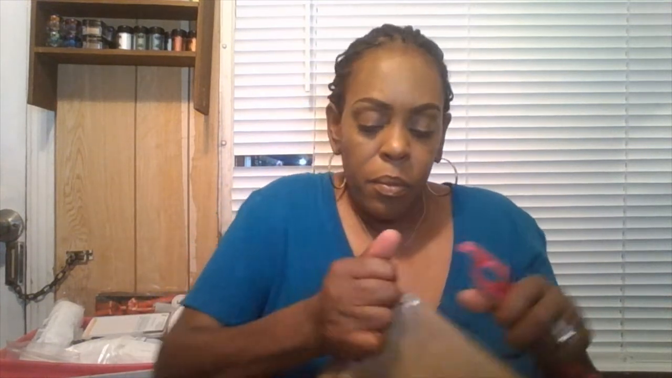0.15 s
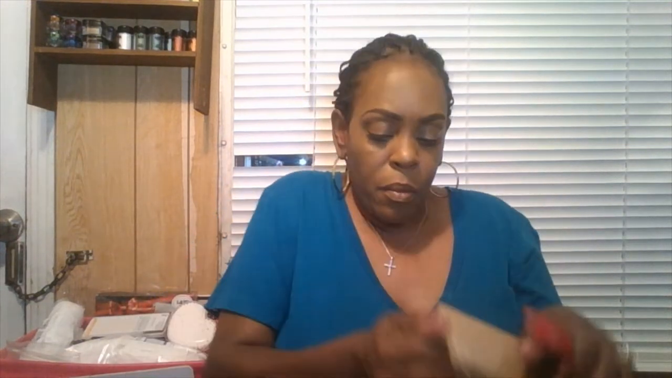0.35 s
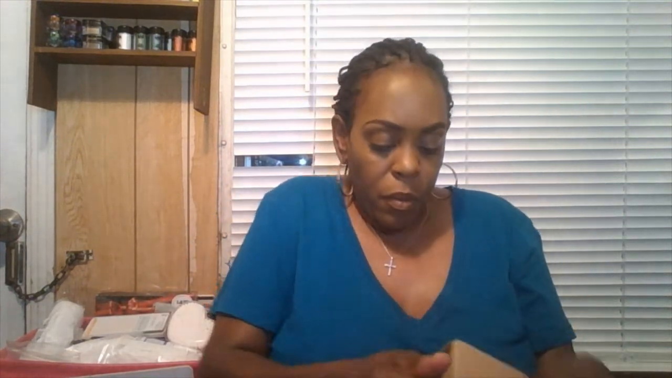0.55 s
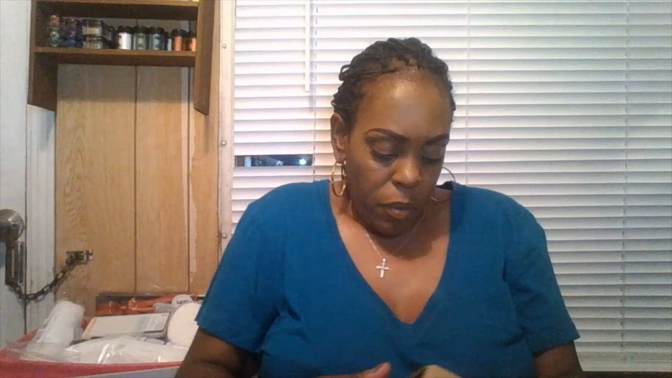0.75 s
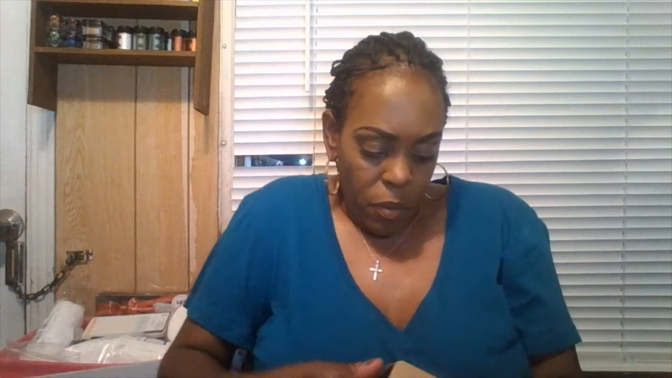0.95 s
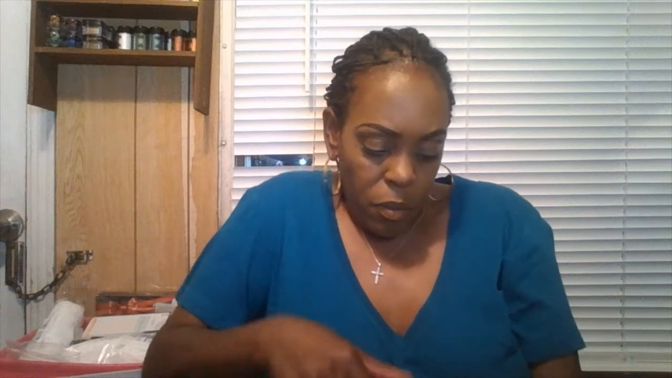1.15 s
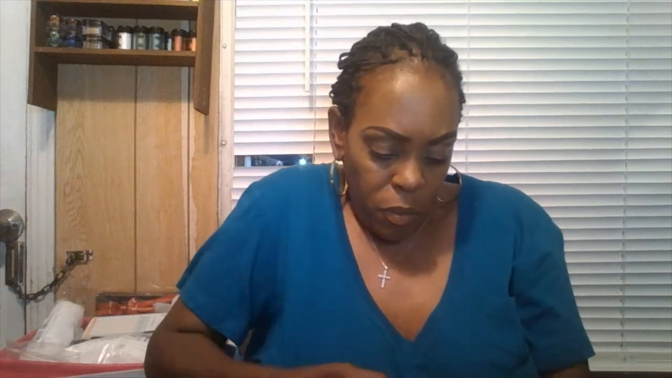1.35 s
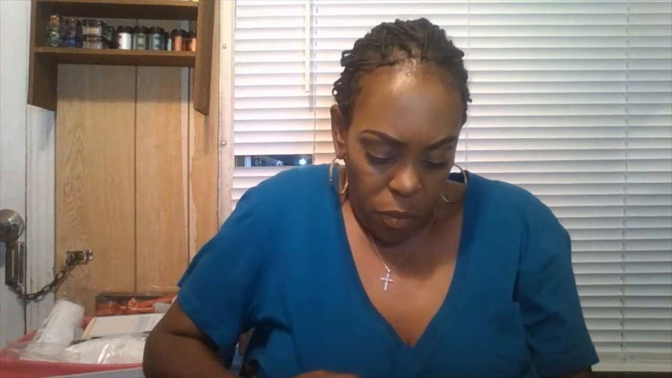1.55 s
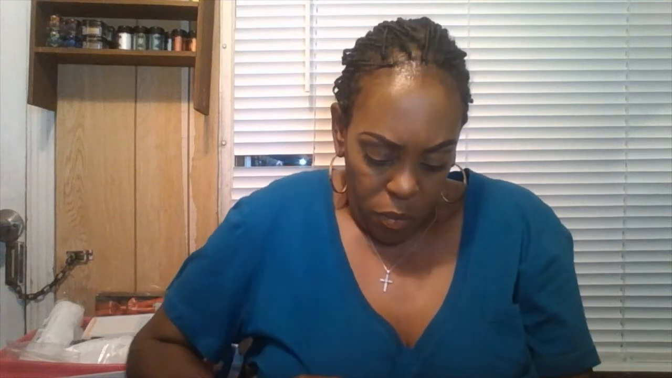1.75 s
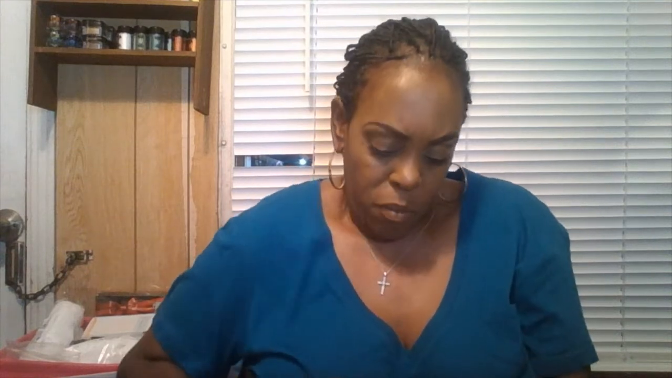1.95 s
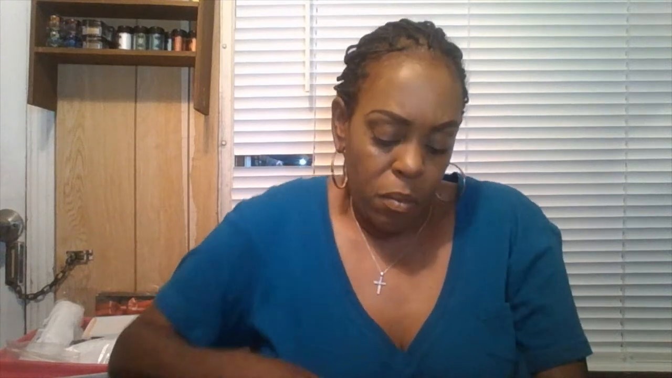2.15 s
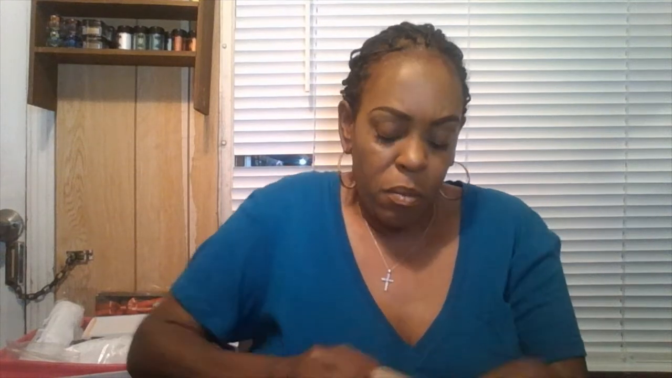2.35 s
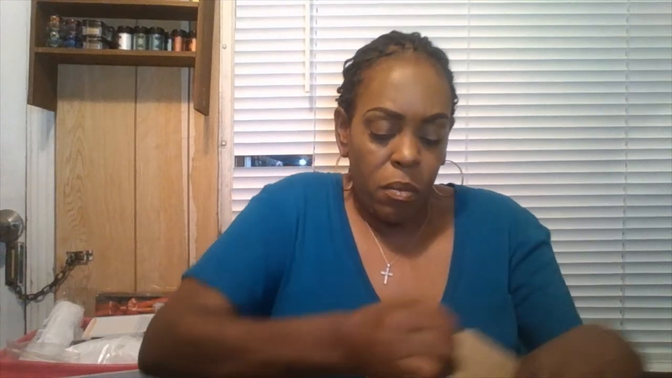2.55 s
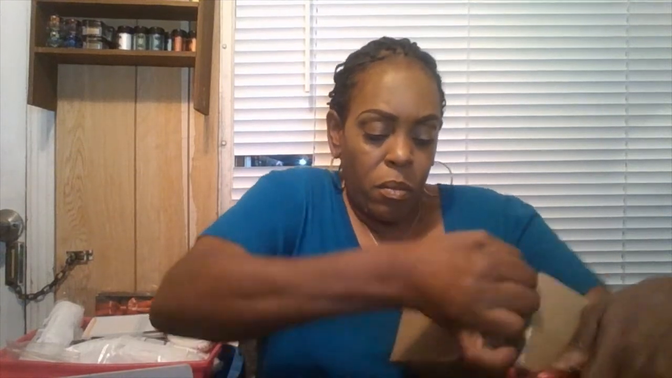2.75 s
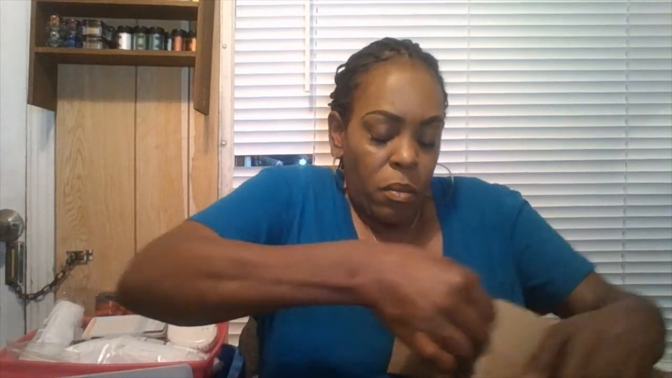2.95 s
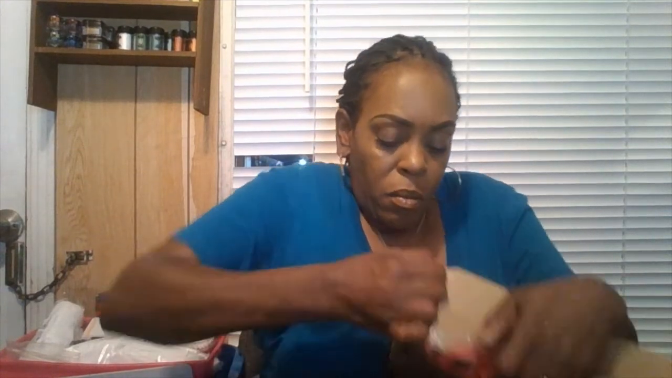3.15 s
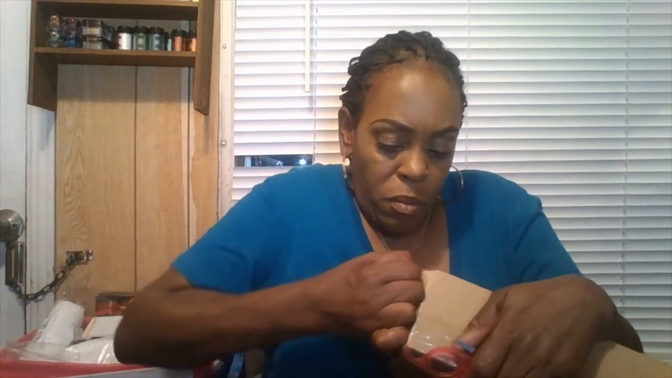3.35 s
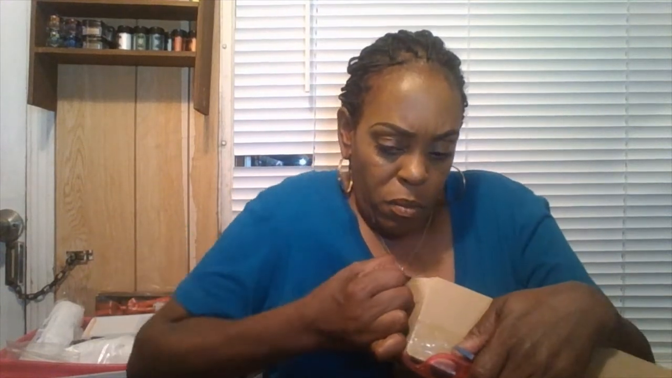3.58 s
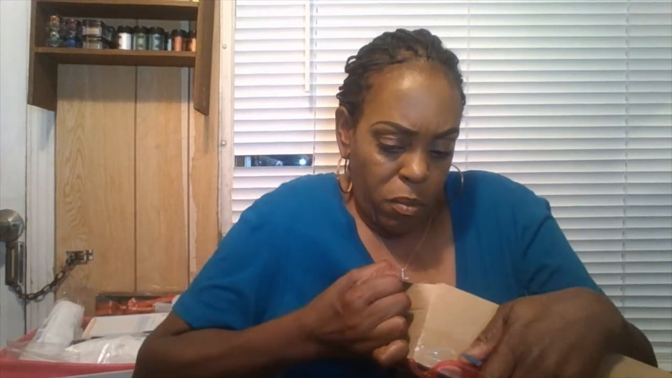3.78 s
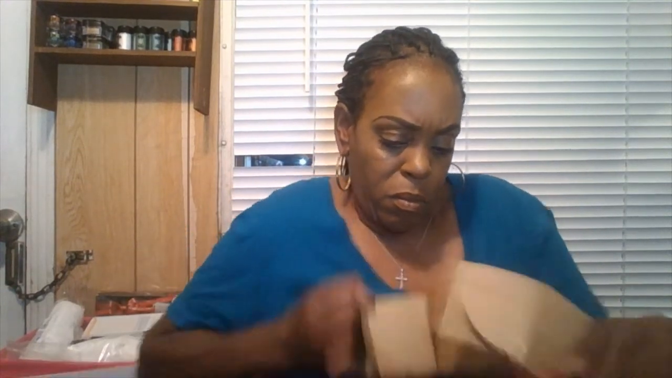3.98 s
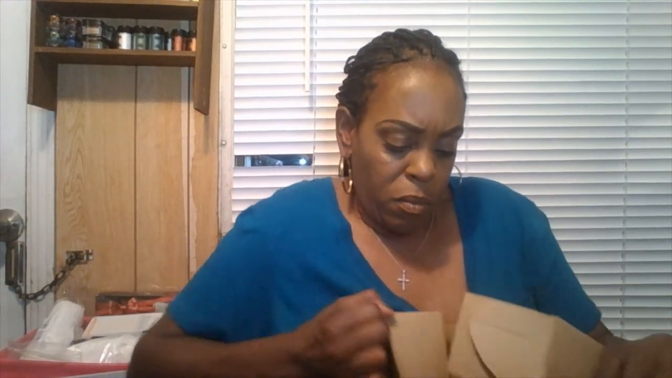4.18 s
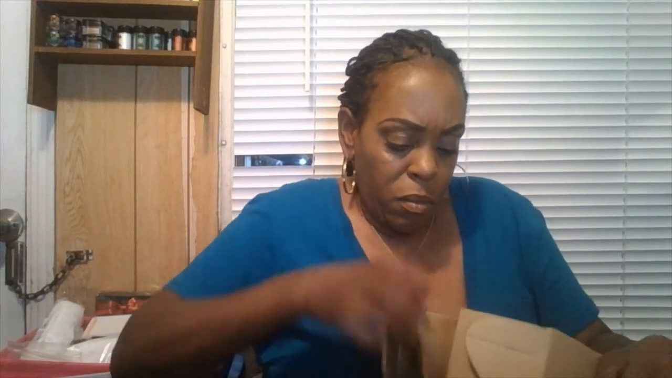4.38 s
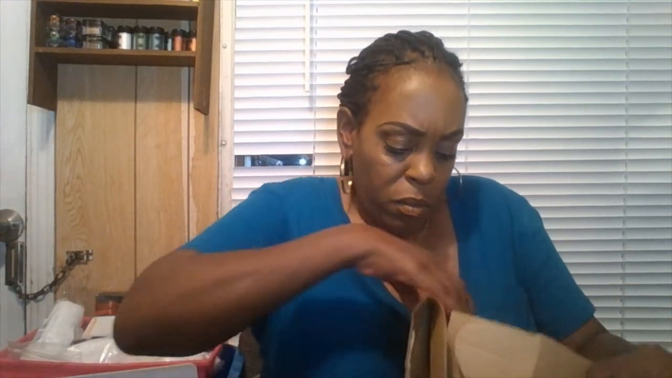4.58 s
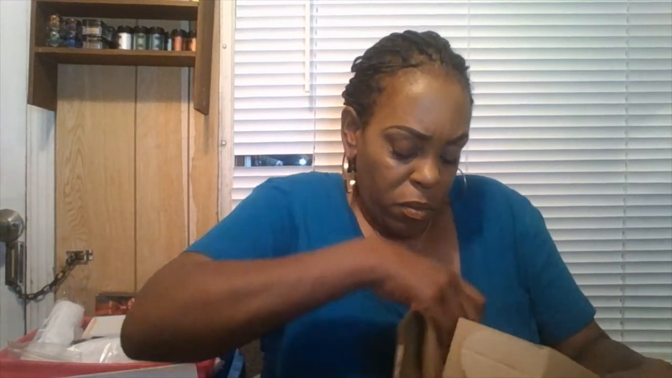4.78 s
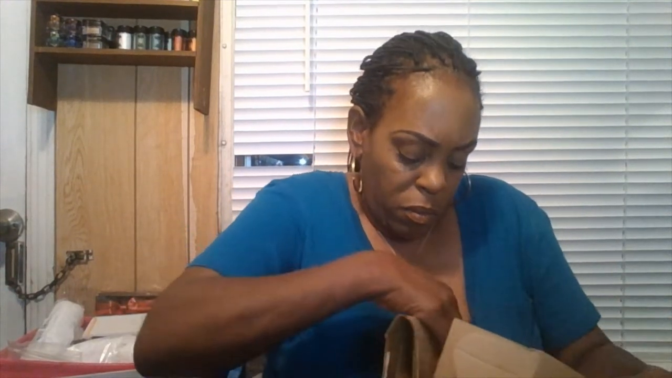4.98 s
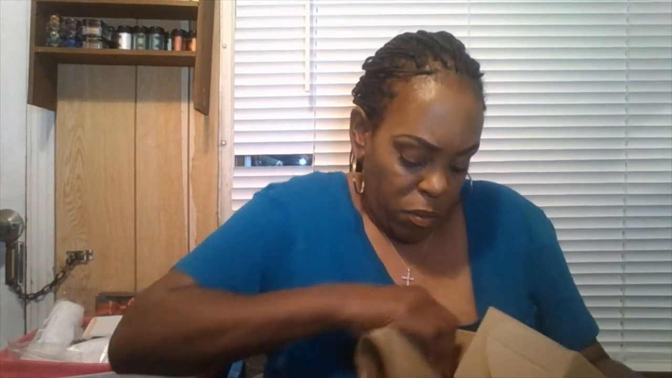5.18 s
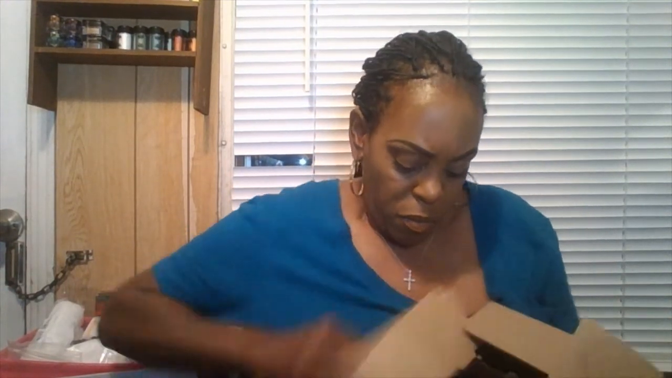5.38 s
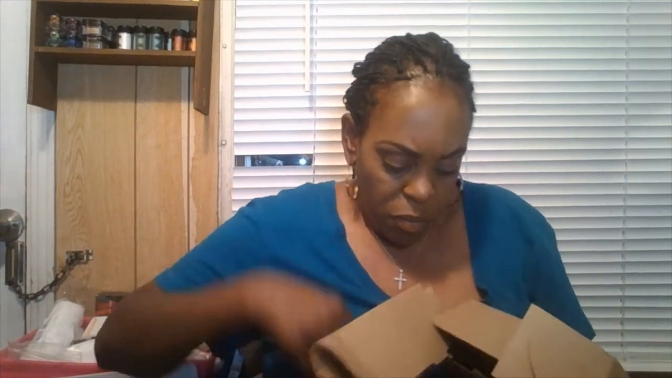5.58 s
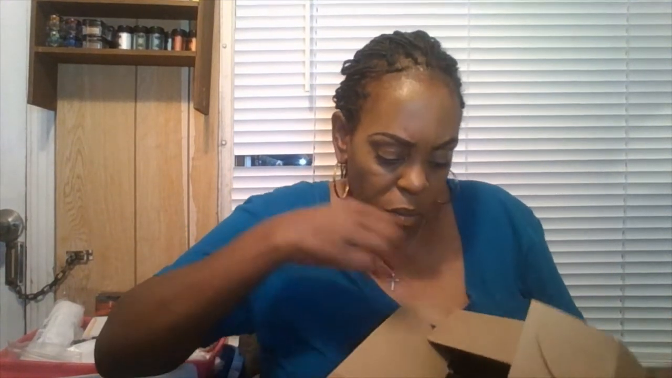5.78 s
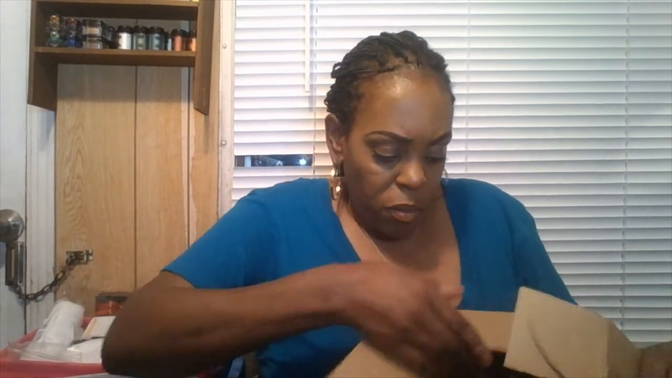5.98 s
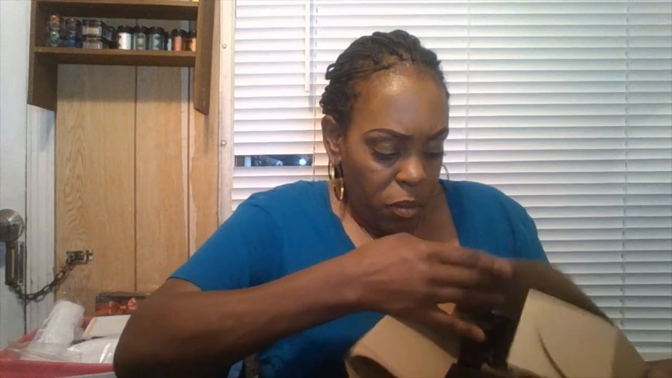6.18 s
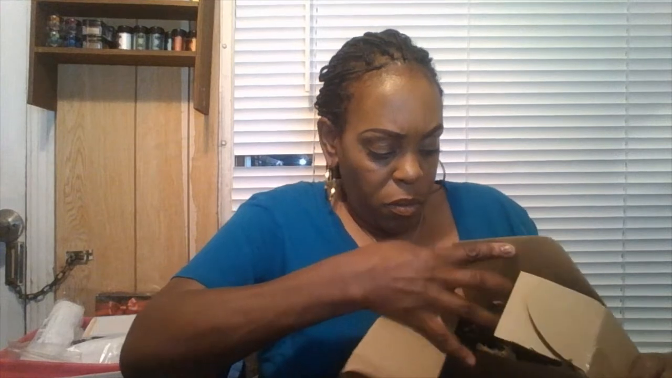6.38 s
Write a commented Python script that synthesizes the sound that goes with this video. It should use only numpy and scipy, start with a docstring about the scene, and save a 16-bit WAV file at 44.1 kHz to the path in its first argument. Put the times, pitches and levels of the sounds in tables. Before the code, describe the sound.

A small nearby microphone catches cardboard being pulled open indoors. Light fibrous rubbing and dull flap knocks lead to a series of dry ticks and more knocks. Tape suddenly tears with a burst of snaps; after gentle handling it rips again, louder and more abrupt, and settles into faint rustle. Room reflections are short, over steady low hum, hiss and wavering drone.

```python
"""A small room: a cardboard box is handled and pulled open close to a small microphone.
Flaps rub as dense catches of fibres; knocks, creases and swinging panels ring the card.
A strained fold ticks in decaying modes; twice the tape rips loose in a run of snaps over surging friction.
Quick reflections and a faint tail place it in the room, over filtered-noise hiss, a steady low hum
and a wavering two-harmonic drone like that of a distant engine."""
import sys
import numpy as np
from scipy import signal
from scipy.fft import rfft, irfft
from scipy.io import wavfile
from scipy.ndimage import uniform_filter1d, map_coordinates

SR = 44100
rng = np.random.default_rng(int(sys.argv[2]) if len(sys.argv) > 2 else 0)


def bounce(signal):
    """Save signal as a 16-bit WAV file at the path given by the first command-line argument."""
    frames = np.transpose(np.atleast_2d(signal))
    limited = np.clip(frames, -1, 1)
    pcm = np.round(limited * 32767).astype(np.int16)
    wavfile.write(sys.argv[1], SR, pcm)


N = 283632
TIME = np.arange(N) / SR

# In contact tables, level is the reference that the tilts of the six ranges are added to.
# Hands and flaps sliding over the card:
# (start [s], length [s], swell from start to end [dB], level [dB], bass [dB re level], treble [dB re level])
STROKES = [(0.402, 0.014, -3, -49.5, -4, -46), (0.478, 0.078, 2.5, -37.5, -14, -32.5),
           (0.65, 0.13, -12, -55.5, -13, -27), (0.869, 0.12, -1, -55, -24, -18),
           (1.136, 0.08, 1.5, -49, -28, -10), (1.844, 0.22, 9, -57.5, -28, -13.5),
           (2.191, 0.12, -4.5, -50.5, -3, -13.5), (2.41, 0.12, 4, -55, 1, -13.5),
           (2.499, 0.1, 11, -51, 7, -31), (2.647, 0.026, 6, -42, 0.5, -21),
           (2.847, 0.039, -5.5, -45, -2, -26.5), (3.012, 0.014, 3, -54, 2, -12.5),
           (3.635, 0.1, 3.5, -39, -30.5, -11.5), (3.82, 0.12, 6.5, -45, -14.5, -16),
           (3.967, 0.14, 10.5, -26.5, -25, -14), (4.132, 0.099, -0.5, -41.5, -7.5, -16),
           (4.359, 0.092, 7, -59.5, -5, -7.5), (4.478, 0.073, -1, -58, -16, -4.5),
           (4.656, 0.025, 2.5, -47.5, 2.5, -26), (4.693, 0.034, -4.5, -62, 14.5, 1),
           (4.773, 0.094, -1, -67, 13.5, -32), (4.903, 0.0097, 0.5, -56.5, -2, -6),
           (5.037, 0.094, 2.5, -63.5, 5, -1.5), (5.173, 0.017, 10.5, -62.5, 5, -10.5),
           (5.645, 0.14, -11, -65, 9, -4.5), (6.168, 0.1, 2, -54.5, -4.5, 0),
           (6.25, 0.19, -12, -64, -2.5, -0.5)]
# Surges of the giving tape; rise and fall are the times for 60 dB:
# (peak time [s], rise [s], fall [s], level [dB], bass [dB re level], treble [dB re level])
TEARS = [(4.093, 0.16, 0.07, -16.5, -19, -8.5), (5.422, 0.011, 0.05, -8.5, -22.5, -14),
         (5.439, 0.063, 0.054, -18, -9, -18.5), (5.485, 0.21, 0.086, -25, -6, -7.5),
         (5.558, 0.16, 0.13, -29.5, -5, -9)]
# Knocks of the flaps and snaps of the tape, level taken over 10 ms:
# (time [s], level [dB], bass [dB re level], treble [dB re level])
SNAPS = [(0.385, -39, -4, -32), (0.451, -67, 18, 4), (0.5690, -31, -9, -24.5), (0.6621, -52, -6, -13),
         (0.897, -49.5, 0, -15.5), (1.121, -62, 11.5, -9), (1.331, -44, -24, -17), (1.4482, -49, -9, -5.5),
         (1.6449, -50.5, -6.5, -30), (1.683, -48.5, -4, -32), (2.199, -31.5, -15, -22),
         (2.213, -47, -16, -6.5), (2.614, -45, -19, -14), (2.6556, -34.5, -6, -18.5), (2.664, -47, -1, -9),
         (2.7428, -39, 6.5, -29), (2.7966, -38, -0.5, -24), (3.6338, -32.5, -9, -20),
         (3.9788, -30.5, -13, -13.5), (4.078, -23.5, -5, -5), (4.087, -14, -20.5, -10.5),
         (4.0903, -13, -19, -8.5), (4.1, -19, -8, -11), (4.1107, -25.5, -6.5, -6), (4.128, -23.5, -9, -9),
         (4.1486, -28.5, -12, -22), (4.186, -45.5, -12, -8), (4.365, -45.5, -15, -17),
         (4.5158, -61.5, -8, -1), (4.631, -52, -5, -6.5), (4.6485, -39, 5.5, -19), (4.789, -54.5, 6.5, -32),
         (5.097, -39.5, -7, -14), (5.408, -32, -22, -5), (5.4214, -12, -38, -12), (5.4289, -27, 6, -29),
         (5.4338, -10, -17.5, -13), (5.443, -17, -14, -30), (5.474, -22.5, -6, -10),
         (5.4795, -19.5, -18, -18), (5.4865, -26.5, -7.5, -23), (5.502, -34, -4, -7),
         (5.5229, -30, -8.5, -35), (5.5324, -22, -5, -17.5), (6.193, -66.5, -22, 11), (6.282, -60, -9, 10),
         (6.285, -41.5, -7, 1)]
# Flexes that set one panel mode swinging, level before the gradual onset and the decay:
# (time [s], level [dB], settled pitch [Hz], t60 [s])
BUMPS = [(0.854, -39.5, 2280, 0.021), (1.052, -44.5, 198, 0.21), (1.134, -39, 325, 0.022),
         (1.26, -31.5, 131, 0.032), (1.412, -33.5, 241, 0.049), (1.422, -29, 143, 0.029),
         (2.574, -30, 330, 0.018), (2.657, -26.5, 556, 0.067), (4.086, -12, 1290, 0.049),
         (4.088, -14, 1560, 0.06), (4.089, -19, 373, 0.12), (4.091, -14, 4170, 0.024),
         (4.1, -21.5, 160.3, 0.1), (4.11, -11, 2810, 0.018), (4.144, -18.5, 221, 0.047),
         (4.233, -31.5, 155.4, 0.18), (4.65, -13, 644, 0.013), (5.4216, 4.5, 1324, 0.021),
         (5.422, -18, 2030, 0.17), (5.423, -27, 2500, 0.15), (5.425, -21, 810, 0.055),
         (5.425, -7, 251, 0.046), (5.427, -22.5, 294, 0.16), (5.432, -26, 137, 0.12),
         (5.5328, -24.5, 3470, 0.016), (5.535, -19.5, 710, 0.05), (5.698, -31, 706, 0.013),
         (6.284, -37, 2280, 0.076)]
# Slips of the strained fold, before the room: (time [s], peak level [dB])
TICKS = [(0.897, -32), (0.916, -49), (0.934, -37), (0.963, -39.5), (1.7878, -32.5), (1.8472, -24.5),
         (1.9213, -24.5), (1.96, -26.5), (1.996, -28.5), (2.021, -33), (2.0462, -30.5), (3.852, -38),
         (3.895, -29.5), (3.907, -30), (3.923, -23), (3.9329, -27)]
# Mean modes of the fold; each slip varies pitch and level:
# (frequency [Hz], relative level [dB], t60 [s], delay [s])
FOLD_MODES = [(1180, 11, 0.0068, 0), (970, 4, 0.0088, 0), (593, 1, 0.0069, 0.005), (5156, -7.5, 0.0043, 0),
              (7730, -10, 0.0012, 0)]
# A tick as heard directly and from near surfaces: (delay [s], level [dB re tick])
TICK_ECHOES = [(0, 0), (.004, -21), (.0095, -21)]
# Broad colour of the card: (frequency [Hz], relative level [dB])
CARD_COLOUR = [(40, -29.5), (140, -15), (270, -5), (380, -9.5), (480, -9), (750, 1.5), (1300, 1.5),
               (1900, -2.5), (2750, -5), (3400, -15.5), (4100, -14.5), (8500, -14), (11500, -25.5)]
# Resonances of the box panels: (frequency [Hz], width [Hz], gain added to the colour [dB re colour])
PANELS = [(317, 25, -3), (600, 90, 3), (990, 88, -6), (1345, 280, -4), (1650, 90, -5), (2550, 300, -8),
          (4900, 1100, 0)]
# Edges between the six ranges of the box: (frequency [Hz])
CROSSOVERS_HZ = [420, 950, 1950, 3200, 7000]
# Decay of the room's tail: (frequency [Hz], t60 [s])
ROOM_DECAY = [(100, 0.25), (300, 0.41), (1500, 0.58), (5000, 0.13), (11000, 0.65)]
# Spectrum of the steady hiss: (frequency [Hz], relative level per Hz [dB])
HISS_COLOUR = [(20, -7.5), (45, -17.5), (75, 5.5), (130, 9), (250, -8), (500, -11), (1200, -8.5),
               (2700, -19.5), (3600, -29), (5500, -28.5), (10500, -30.5), (12000, -48)]
# Course of the drone before its waver: (time [s], pitch [Hz], fundamental [dB], second harmonic [dB])
DRONE_COURSE = [(0, 105.5, -77, -62), (.6, 108.5, -73, -60), (1.2, 111.8, -58.5, -64),
                (2.2, 108.1, -61.5, -65.5), (2.5, 91.4, -51.5, -52.5), (2.9, 86.82, -54, -62.5),
                (4.2, 85.43, -57, -55.5), (4.9, 89.17, -56.5, -65), (6.43, 90.7, -59.5, -69.5)]

# a stroke grows to full strength by its start time, and decays after its length
ATTACK_S, RELEASE_T60 = 0.035, 0.12
# the hands' hold on the box: level [dB], bass [dB re level], treble [dB re level]
GRIP, GRIP_WAVER_DB = (-68, 0.43, -9.5), 5
GRIP_FROM_S, GRIP_UNTIL_S, GRIP_FADE_S = 0.27, 6, 0.19
# flap: mean round trip from hand to edge, its relative drift (rms), drift rate, share the edge returns
SPAN_ECHO_S, SPAN_DRIFT, SPAN_DRIFT_HZ, EDGE_RETURN = .0027, .09, 2.1, 0.15
EDGE_HZ = 11500  # upper band limit of the microphone signal


def rubbing(box, catches_per_s=900, spread_db=0.5, smooth_db=-19, fizz_db=-10, spot_db=4.0,
            judder_db=1.78, level_db=-1.5):
    """Fibres catch and let go: dense uneven clicks shake the box, with a finer fizz in the treble."""
    sizes = amp(spread_db * np.minimum(rng.exponential(1, N), 3.5)) * rng.choice([-1, 1], N)
    catches = sizes * (rng.random(N) < catches_per_s / SR)
    friction_dbs = [smooth_db] * 4 + [fizz_db] * 2
    out = np.zeros(N)
    for ring, gain, friction_db in zip(box, pressure(), friction_dbs):
        # each catch is at another spot of the card and so has its own colour
        spotted = catches * amp(spot_db * rng.standard_normal(N))
        drive = spotted + amp(friction_db) * rng.standard_normal(N)
        band = signal.oaconvolve(drive, ring)[:N]
        # hand pressure sets the mean power; single catches stay uneven
        mean_power = abs(uniform_filter1d(band ** 2, size=1300))
        out += gain * band / np.sqrt(mean_power + 1e-12)
    return out * amp(level_db + judder_db * wander(70))


def contacts(t):
    """Every sliding or tearing contact: its envelope and its (level, bass, treble)."""
    yield gripped(t) * amp(GRIP_WAVER_DB * np.interp(t, TIME, wander(3.4))), GRIP
    for start, length, swell_db, *strength in STROKES:
        age = t - start
        attack = np.clip(1 + age / ATTACK_S, 0, 1) ** 2
        push_db = swell_db * (np.clip(age / length, 0, 1) - .5)
        release_db = -60 * np.maximum(age - length, 0) / RELEASE_T60
        yield attack * amp(push_db + release_db), strength
    for peak, rise, fall, *strength in TEARS:
        yield amp(-60 * np.maximum((peak - t) / rise, (t - peak) / fall)), strength


def gripped(t):
    """How firmly the hands hold the box, 0-1: they take hold and let go gradually."""
    return np.clip(np.minimum(t - GRIP_FROM_S, GRIP_UNTIL_S - t) / GRIP_FADE_S, 0, 1)


def pressure():
    """How hard all contacts together drive each range of the box: their powers add."""
    t = TIME[::22]  # a coarse clock is enough for envelopes
    power = sum(np.outer(range_gains(*strength), envelope) ** 2 for envelope, strength in contacts(t))
    return [np.interp(TIME, t, np.sqrt(p)) for p in power]


def flexed(x, count=3):
    """Waves run to the flap's edge and back; the span changes as the hands move, so resonances glide."""
    at = np.arange(N)
    lag = SPAN_ECHO_S * SR * np.exp(SPAN_DRIFT * wander(SPAN_DRIFT_HZ))  # samples
    gains = EDGE_RETURN ** np.arange(count + 1)
    echoes = sum(gain * map_coordinates(x, [at - k * lag], order=3) for k, gain in enumerate(gains))
    return echoes / np.linalg.norm(gains)


def snaps(box, crack_t60=0.007, crumble=0.32, crumble_t60=0.091, fibres=0.37):
    """Each release is a brief crack and a dying crumble of fibres, rung through its spot of the box."""
    out, t = np.zeros(N), np.arange(SR // 10) / SR
    fall = amp(-60 * t / crack_t60) + crumble * amp(-60 * t / crumble_t60)
    for s, *strength in SNAPS:
        sparse = rng.random(len(t)) < .25
        drive = fibres * fall * rng.standard_normal(len(t)) * sparse
        drive[0] = 1
        drive = signal.fftconvolve(drive, spot_ring(t[:len(t) // 2]))[:len(t)]
        for ring, gain in zip(box, range_gains(*strength)):
            band = signal.fftconvolve(drive, ring)
            # unit rms if all the energy fell within 10 ms
            add(out, s, gain * band / np.linalg.norm(band) * np.sqrt(SR / 10 / 10))
    return out


def bumps(rise_turns=0.52, stretch=0.025, relax_turns=3):
    """The panel swings up within a cycle or two; its pitch sags as the push relaxes."""
    out, t = np.zeros(N), np.arange(SR // 4) / SR
    for s, db, hz, t60 in BUMPS:
        pitch = hz * (1 + stretch * np.exp(-t * hz / relax_turns))
        turns = np.cumsum(pitch) / SR
        swing = (1 - np.exp(-turns / rise_turns)) * amp(db - 60 * t / t60)
        add(out, s, swing * np.sin(2 * np.pi * turns))
    return out


def crinkles(box, per_s=16, level_db=-62, spread_db=4.5, bass_db=-3, treble_db=-15, count=12):
    """Small creases give at random while the box is held, each at one of a dozen spots of the card."""
    sizes = amp(spread_db * np.minimum(rng.exponential(1, N), 2))
    clicks = sizes * (rng.random(N) < per_s / SR) * gripped(TIME)
    ring = sum(gain * evened(r) for r, gain in zip(box, range_gains(level_db, bass_db, treble_db)))
    spot, t = rng.integers(0, count, N), TIME[:SR // 20]
    rings = [spot_ring(t) for _ in range(count)]
    creases = np.zeros(N)
    for at in np.flatnonzero(clicks):
        own_ring = rings[spot[at]]
        add(creases, at / SR, clicks[at] * own_ring / np.linalg.norm(own_ring))
    # box ring referred to 10 ms, as for the snaps
    return signal.oaconvolve(creases, ring * np.sqrt(SR / 10 / 10 / len(ring)))[:N]


def ticks(rise_turns=1.0, detune=0.075):
    """The fold slips; its high bending waves arrive ahead of the lowest, then near surfaces answer."""
    out, t = np.zeros(N), np.arange(SR // 20) / SR
    for s, db in TICKS:
        tick = np.zeros(len(t))
        for hz, mode_db, t60, delay in FOLD_MODES:
            age = np.maximum(t - delay, 0)
            pitch, strength = rng.standard_normal(2)
            turns = hz * (1 + detune * pitch) * age
            envelope = (1 - np.exp(-turns / rise_turns)) * amp(mode_db + 2 * strength - 60 * age / t60)
            tick += envelope * np.sin(2 * np.pi * turns)
        tick *= amp(db) / abs(tick).max()
        for delay, echo_db in TICK_ECHOES:
            add(out, s + delay, amp(echo_db) * tick)
    return out


def box_responses(size=4096):
    """Causal (minimum-phase) ring of the box in six ranges, from bass to treble."""
    hz = abs(np.fft.fftfreq(size, 1 / SR)) + 1
    resonances = sum(amp(db) / (1 + (2 * (hz - f) / width) ** 2) for f, width, db in PANELS)
    colour = amp(read(CARD_COLOUR, hz)) * (1 + resonances)
    # share of the power below each crossover; differences give the ranges
    below = [0 * hz] + [1 / (1 + (hz / edge) ** 12) for edge in CROSSOVERS_HZ] + [1 + 0 * hz]
    log_gains = [np.log(colour * np.sqrt(abs(share)) + 1e-5) for share in np.diff(below, axis=0)]
    return [np.fft.ifft(np.exp(np.conj(signal.hilbert(g)))).real[:size // 2] for g in log_gains]


def spot_ring(t, count=14, low_hz=600, high_hz=9000, ring_turns=38, ring_gain=0.8):
    """Every spot of the card favours a few random modes; high ones die sooner."""
    hz = low_hz * (high_hz / low_hz) ** rng.random((count, 1))
    decay = np.pi * hz / ring_turns
    modes = 2 * decay / SR * np.exp(-decay * t) * np.cos(2 * np.pi * hz * t)
    ring = ring_gain * modes.sum(0)
    ring[0] += 1  # the direct click
    return ring


def range_gains(level, bass, treble, body_db=-3.5, body_share=0.36, middle_db=-3.5,
                edge_db=-1, edge_share=0.51, treble_db=-3.0, air_db=0.0, air_share=1.74):
    """A heavy contact also fills the low middle; a sharp one the upper middle and most the very top."""
    body = body_db + body_share * np.minimum(bass, 2)
    edge = edge_db + edge_share * treble
    air = air_db + air_share * treble
    tilts = [bass, body, middle_db, edge, treble_db + treble, air]
    return [amp(level + tilt) for tilt in tilts]


def room(x, early_db=-11, early_t60=0.033, tail_db=-22):
    """Quick reflections from desk and walls, then a faint tail whose decay depends on frequency."""
    t = np.arange(SR // 2) / SR
    signs = rng.choice([-1., 1.], (2, len(t)))
    # sparse echoes, 2000 a second, none within 3 ms
    near, far = signs * (rng.random((2, len(t))) < 2000 / SR) * (t > .003)
    near = near * amp(-60 * t / early_t60)
    hz, frame_s, z = signal.stft(far, SR, nperseg=256)
    decay = amp(-60 * frame_s / read(ROOM_DECAY, hz)[:, None])
    far = signal.istft(z * decay, SR, nperseg=256)[1][:len(t)]
    response = amp(early_db) * near / np.linalg.norm(near) + amp(tail_db) * far / np.linalg.norm(far)
    return x + signal.fftconvolve(x, response)[:N]


def background(hiss_db=-59.5, waver_db=4.0, drift=0.013, hum_hz=88.8, hum_db=-59):
    """Coloured-noise hiss, a steady sine hum and a two-harmonic drone wavering in pitch and level."""
    spectrum = rfft(rng.standard_normal(N)) * amp(read(HISS_COLOUR, np.fft.rfftfreq(N, 1 / SR)))
    hiss = amp(hiss_db) * evened(irfft(spectrum, N))
    hz, first_db, second_db = curves(DRONE_COURSE)
    phase = 2 * np.pi * np.cumsum(hz * (1 + drift * wander(3.8))) / SR
    drone = np.zeros(N)
    for harmonic, db in ((1, first_db), (2, second_db)):
        drone += amp(db + waver_db * wander(18)) * np.sin(harmonic * phase)
    hum = amp(hum_db) * np.sin(2 * np.pi * hum_hz * TIME)
    return hiss + drone + hum


def amp(db):
    """Decibels to amplitude."""
    return 10 ** (np.asarray(db) / 20)


def evened(x):
    """Scale to unit rms."""
    return x / np.sqrt(np.mean(x ** 2) + 1e-20)


def read(points, hz):
    """A spectrum table at any frequency, interpolated on a logarithmic axis."""
    f, value = np.transpose(points)
    return np.interp(np.log(hz + 1), np.log(f), value)


def curves(rows):
    """Each column of a time table at every sample."""
    s, *columns = np.transpose(rows)
    return [np.interp(TIME, s, c) for c in columns]


def add(mix, s, sound):
    """Mix a sound in place from s seconds on, cut at the end."""
    part = mix[max(round(s * SR), 0):][:len(sound)]
    part += sound[:len(part)]


def wander(hz):
    """Slow random motion of unit rms, mostly below hz."""
    lowpass = 1 / (1 + (np.fft.rfftfreq(N, 1 / SR) / hz) ** 4)
    return evened(irfft(rfft(rng.standard_normal(N)) * lowpass, N))


def scene():
    """All sounds of the box in the room, with the background beneath."""
    box = box_responses()
    handling = flexed(rubbing(box)) + snaps(box) + crinkles(box) + bumps() + ticks()
    return (room(handling) + background())[None]


def record(dry):
    """The microphone signal: loud peaks rounded off, then deep bass and top treble cut."""
    ceiling = .9
    rounded = dry / (1 + (dry / ceiling) ** 4) ** (1 / 4)
    thinned = signal.sosfilt(signal.butter(2, 50, "high", fs=SR, output="sos"), rounded)
    band_limit = signal.firwin(141, EDGE_HZ, window=("kaiser", 8), fs=SR)
    return signal.oaconvolve(thinned, band_limit[None], "same")


dry = scene()
out = record(dry)
bounce(out)
```